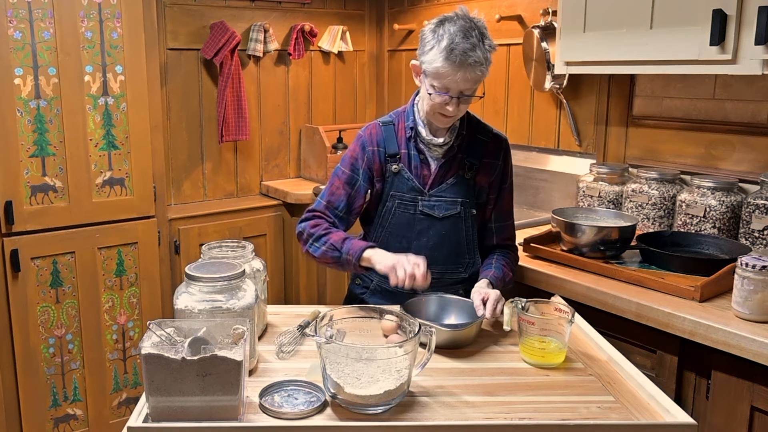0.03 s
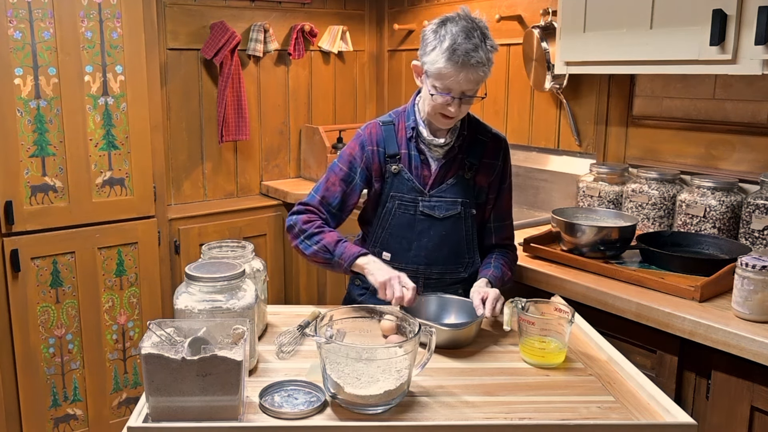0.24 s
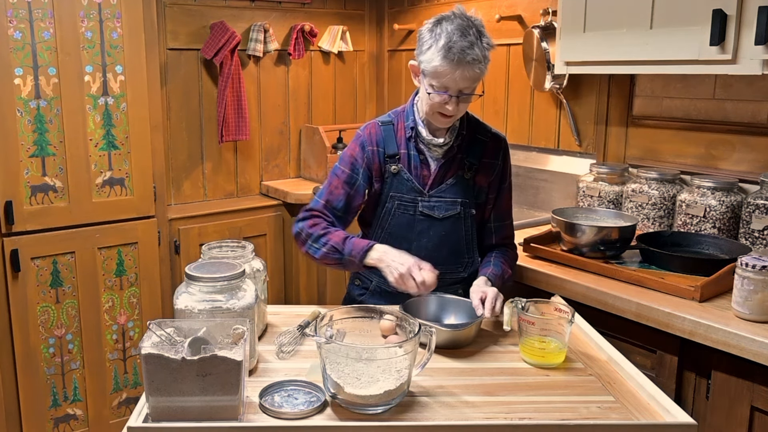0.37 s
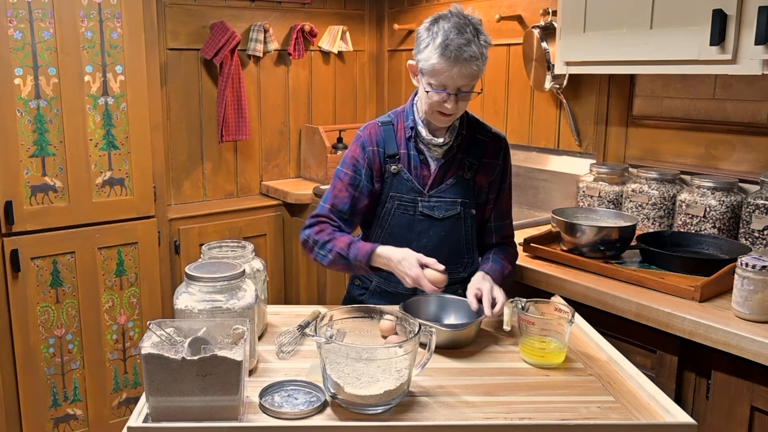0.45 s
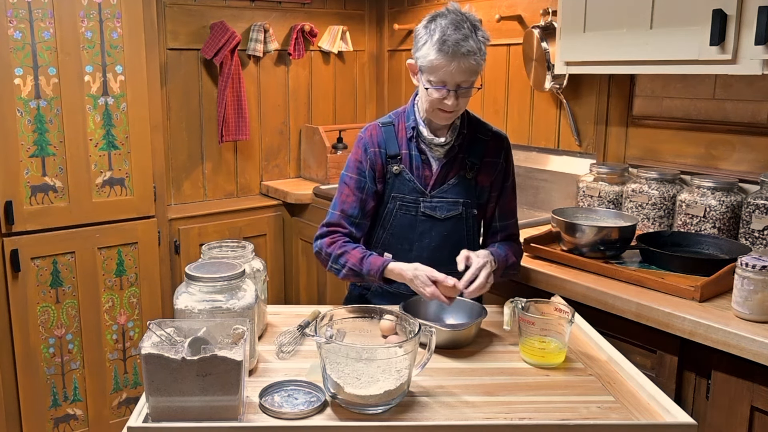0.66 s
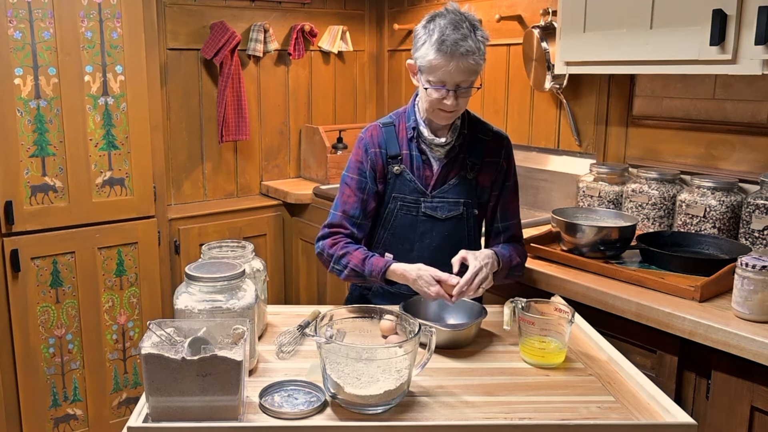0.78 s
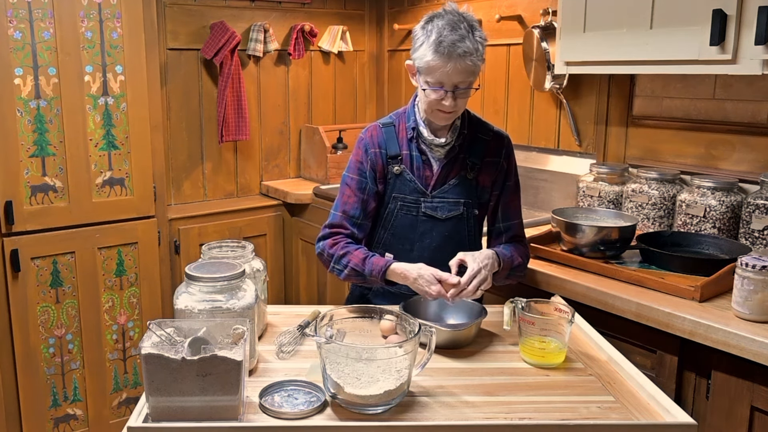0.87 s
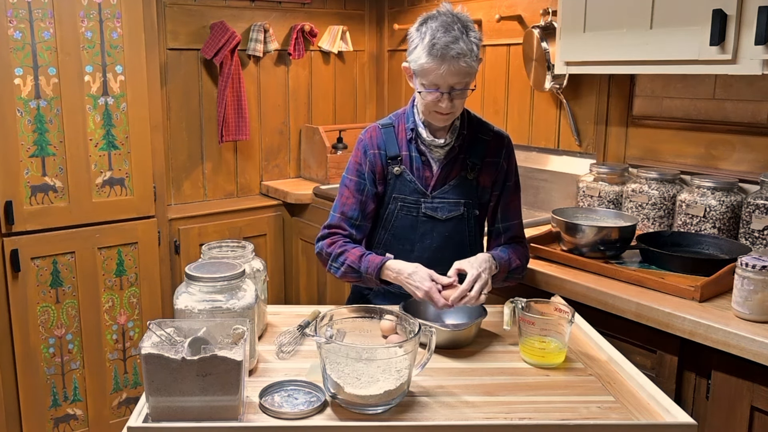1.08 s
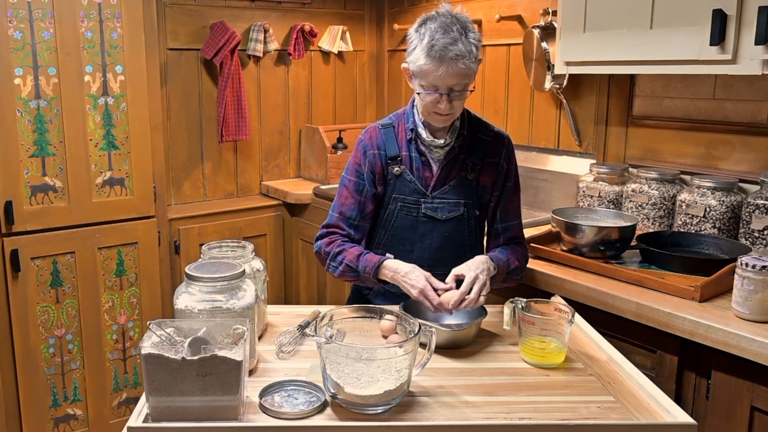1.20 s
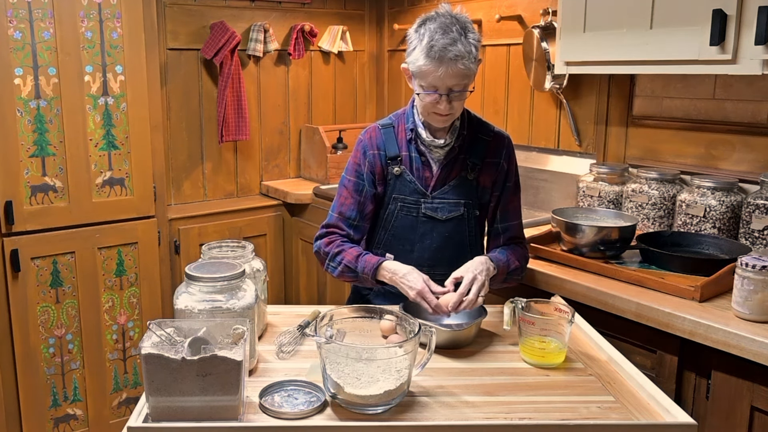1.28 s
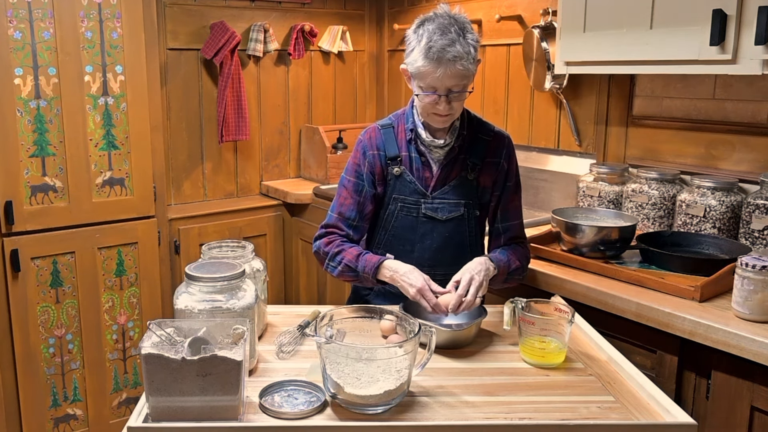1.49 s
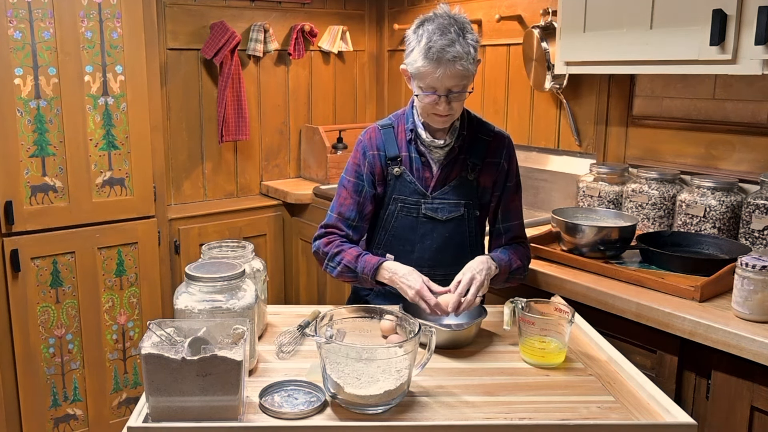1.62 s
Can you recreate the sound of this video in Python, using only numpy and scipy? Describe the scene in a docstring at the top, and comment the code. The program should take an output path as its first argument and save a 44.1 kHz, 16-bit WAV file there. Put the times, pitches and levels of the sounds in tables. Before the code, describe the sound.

An egg is cracked on a steel bowl: soft hand rubbing and a faint bump at 0.13 s, then one loud, crunchy knock at 0.22 s with a short damped clink, wooden table thump and brief room echo. Light rubbing and a thin squeak fade by 0.6 s. Near quiet follows, faint shell crackles around 1.0 s, crisper snaps at 1.35-1.44 s, then low room noise.

```python
"""In a small kitchen an egg is knocked once on the rim of a steel bowl that stands on a wooden table.
Filtered bursts make the shell's crunch and the thud; decaying sines make the bowl's clink and the table's thump.
The egg rubs and squeaks off the rim, then thumbs press until the shell crackles, snaps and comes apart:
random grains for rubbing and crackle, short bursts for snaps, narrow gliding noise for squeaks.
Fingers scuff the bowl, diffuse echo follows the egg's sounds, and quiet room noise lies under it all."""
import sys
import numpy as np
from scipy import signal
from scipy.fft import rfft, irfft, next_fast_len
from scipy.io import wavfile

SR = 44100
rng = np.random.default_rng(int(sys.argv[2]) if len(sys.argv) > 2 else 0)


def log_audio(samples):
    """Write samples as a 16-bit WAV file to the path given in sys.argv[1]."""
    # one column per channel
    frames = np.atleast_2d(samples).T
    # limit to full scale, then quantise
    limited = np.clip(frames, -1, 1)
    pcm = np.round(limited * 32767).astype(np.int16)
    wavfile.write(sys.argv[1], SR, pcm)


N = 72765
TIME = np.arange(N) / SR
KNOCK_S, BOWL_RISE_S = 0.2218, 0.0011


def from_db(db):
    """Decibels to gain."""
    return 10 ** (np.asarray(db) / 20)


def rms_one(x):
    """Scale to an rms of 1."""
    return x / np.sqrt(np.mean(x ** 2) + 1e-20)


def in_time(rows):
    """Draw each column of a time curve as straight lines, one value per sample."""
    points_s, *columns = np.transpose(rows)
    return [np.interp(TIME, points_s, column) for column in columns]


def at_hz(rows, hz):
    """Read each column of a spectrum at the given frequencies, on a log frequency axis."""
    points_hz, *columns = np.transpose(rows)
    return [np.interp(np.log(hz + 1), np.log(points_hz), column) for column in columns]


def colour(x, spectrum):
    """Causal minimum-phase filter with the given spectrum; white noise keeps its level."""
    size = 2 * next_fast_len(N)
    db, = at_hz(spectrum, np.arange(size // 2 + 1) * SR / size)
    cepstrum = irfft(np.log(rms_one(from_db(db))))
    # folding the cepstrum onto positive time makes the filter causal
    index = np.arange(size)
    fold = 1 + np.sign(size // 2 - index) * (index > 0)
    response = np.exp(rfft(cepstrum * fold))
    return irfft(rfft(x, size) * response)[:N]


def shelf(x, hz, db, side):
    """Lift or lower everything on one side of a frequency with a second-order shelf."""
    gain = from_db(db / 2)
    w = 2 * np.tan(np.pi * min(hz, SR / 2 - 1) / SR)
    b = np.array([1, w * np.sqrt(2 * gain), w * w * gain])
    a = np.array([1, w * np.sqrt(2 / gain), w * w / gain])
    if side == "high":
        b, a = a * gain ** 2, b
    return signal.lfilter(*signal.bilinear(b, a), x + 1e-18)


def peak(x, hz, db, q):
    """Lift a band around one frequency by adding its resonance."""
    resonance = signal.lfilter(*signal.iirpeak(min(hz, SR / 2 - 1), max(q, 1), fs=SR), x + 1e-18)
    return x + (from_db(db) - 1) * resonance


def blow(start_s, rise_s, t60):
    """Envelope of a blow: quick rise, exponential fall."""
    age = np.maximum(TIME - start_s, 0)
    fall = from_db(np.maximum(-60 * age / t60, -300))
    return (1 - np.exp(-age / rise_s)) * fall


def ring(modes, start_s, rise_s):
    """Modes set ringing by a blow: sines of random phase, each with its own decay."""
    out = np.zeros(N)
    for hz, db, t60 in modes:
        tone = np.sin(2 * np.pi * (hz * TIME + rng.random()))
        out += from_db(db) * blow(start_s, rise_s, t60) * tone
    return out


def burst(envelope):
    """A dense run of tiny fractures of random sign under an envelope."""
    return envelope * rng.choice([-1, 1], N)


def grains(per_s):
    """Random clicks of uneven size and sign; rms 1."""
    spread_db = 2.2
    sizes = from_db(spread_db * np.minimum(rng.exponential(1, N), 4))
    clicks = sizes * rng.choice([-1, 1], N)
    return rms_one(clicks * (rng.random(N) < per_s / SR))


def friction(width_hz):
    """The slow random waver of a rubbed resonance: lowpassed noise; rms 1."""
    low_pass = signal.butter(2, width_hz, fs=SR, output="sos")
    return rms_one(signal.sosfilt(low_pass, rng.standard_normal(N)))


def room_noise():
    """The quiet steady noise of the room: white noise under a fixed spectrum."""
    # colour of the noise: f/Hz, relative level/dB per Hz
    floor_spectrum = [(20, -9), (60, 2.5), (150, -6), (600, -15.5), (2000, -23), (6000, -29),
                      (16000, -23.5)]
    return from_db(-68.5) * colour(rng.standard_normal(N), floor_spectrum)


def rubbing():
    """Hand and egg rub on table and bowl: many small dull contacts."""
    # strength of the rubbing: t/s, level/dB
    rub_curve = [(0, -63), (.1, -62), (.135, -44), (.165, -47.5), (.21, -50), (.33, -51.5), (.5, -54.5),
                 (.58, -58), (.65, -79.5), (.9, -72), (1.01, -58), (1.06, -61.5), (1.13, -84),
                 (1.65, -76.5)]
    # colour of the rubbing: f/Hz, relative level/dB
    rub_spectrum = [(40, -3.5), (130, -1.5), (380, 0), (800, -3), (1400, -6.5), (2500, -16), (3500, -9.5),
                    (4900, -18), (10000, -26.5), (16000, -37)]
    db, = in_time(rub_curve)
    return colour(from_db(db) * grains(per_s=2400), rub_spectrum)


def table():
    """The wood answers the hand's soft bump, then the knock passed down through the bowl."""
    # modes of the hand's bump on the bowl: f/Hz, level/dB, t60/s
    bump_modes = [(346, -40.5, 0.22), (804, -34, 0.038), (930, -29, 0.039)]
    # modes of the table under the bowl: f/Hz, level/dB, t60/s
    table_modes = [(112.6, -39, .75), (138.7, -41.5, 0.84), (180, -32, 0.44), (226, -31, 0.26),
                   (291, -17, 0.22), (328.5, -27.5, .14), (377.7, -23.5, .1), (416.6, -21.5, .15),
                   (475.4, -30.5, 0.26), (514, -27.5, 0.16), (631.6, -23.5, 0.12), (747, -23, 0.29),
                   (786, -35, .28), (1150, -28, .13)]
    bump_s, bump_rise_s = 0.125, 0.0054
    lag_s, rise_s = 0.0057, 0.00052
    return ring(bump_modes, bump_s, bump_rise_s) + ring(table_modes, KNOCK_S + lag_s, rise_s)


def ringing():
    """Table and rim ring on, dying faster once the hand rests on the bowl."""
    # mode of the rim that sings on until the hand settles: f/Hz, level/dB, t60/s
    rim_modes = [(2306, -29, 0.72)]
    hand_settles_s, damping_db_per_s = 0.43, 76
    damping = from_db(-damping_db_per_s * np.maximum(TIME - hand_settles_s, 0))
    return (table() + ring(rim_modes, KNOCK_S, BOWL_RISE_S)) * damping


def scuffs():
    """Each stroke of the fingers on the bowl's side swells and fades on one high resonance of the steel."""
    # finger strokes: middle t/s, half length/s, level/dB
    finger_strokes = [(0.139, 0.011, -52.5), (0.188, 0.016, -52), (0.477, 0.046, -60)]
    steel_hz, width_hz = 5090, 220
    swell = sum(from_db(db) * np.exp(-((TIME - s) / length) ** 2) for s, length, db in finger_strokes)
    return swell * friction(width_hz) * np.sin(2 * np.pi * steel_hz * TIME)


def snaps():
    """Each crack breaks sharply, runs on for milliseconds and rings the piece of shell that it frees."""
    # small breaks and touches of the shell:
    # t/s, length/s, level/dB, bass lift/dB, treble lift/dB, pitch of the piece f/Hz
    shell_breaks = [(0.135, 0.0046, -58, 6, -6, 5070), (0.18, 0.0033, -48, -2, -22, 1100),
                    (0.2737, .0012, -23.5, 17, -1, 9100), (0.2755, 0.006, -34.5, 6.5, 3, 9000),
                    (0.904, 0.0015, -62.5, 10, -1, 1980), (.9897, 0.0016, -50.5, 3.5, -8, 3723),
                    (1.0196, 0.0065, -42.5, 6.5, 4, 3900), (1.0229, 0.0042, -47, 18, -14, 890),
                    (1.026, 0.007, -56, -3, 11, 5490), (1.0604, 0.0023, -43.5, -1, 5, 1150),
                    (1.3540, 0.0026, -31, -3.5, 5, 1570), (1.364, .003, -44.5, 1, 0.5, 5490),
                    (1.384, 0.0011, -60, -4, 1, 9000), (1.4017, 0.0058, -37.5, 2.5, 0, 6230),
                    (1.4151, 0.0043, -36, 6.5, -1, 2380), (1.4229, 0.0026, -37.5, -3, 8.5, 14100),
                    (1.4258, 0.0019, -38, -1.5, 5, 650), (1.4355, 0.0013, -39.5, -9, 1, 11200),
                    (1.531, 0.0088, -67, -1, 4, 9000), (1.602, 0.0024, -58, -1, -7, 1800)]
    # colour shared by all breaks: f/Hz, relative level/dB
    shell_spectrum = [(60, -12), (240, 0), (650, 2), (1000, -4), (1430, 3), (2700, -1), (3700, 1),
                      (4400, -5), (6100, -5), (7600, -6.5), (9400, 1), (10700, -5), (13000, -4),
                      (16000, -8)]
    bass_hz, treble_hz = 820, 6650
    first_break_db, piece_peak_db, piece_q = 9.5, 7, 1.5
    out = np.zeros(N)
    for s, length, db, bass_db, treble_db, piece_hz in shell_breaks:
        fade = np.exp(-np.minimum(((TIME - s) / length) ** 2, 20))
        crack = burst((TIME >= s) * fade)
        crack[int(s * SR)] = from_db(first_break_db)
        crack = shelf(crack, bass_hz, bass_db, "low")
        crack = shelf(crack, treble_hz, treble_db, "high")
        out += from_db(db) * peak(crack, piece_hz, piece_peak_db, piece_q)
    return colour(out, shell_spectrum)


def crackle():
    """Shell and membrane crackle finely under strain: bright random grains."""
    # strength of the crackle: t/s, level/dB
    strain_curve = [(.25, -65), (.42, -58.5), (.48, -71.5), (.68, -82.5), (.75, -73.5), (.88, -72),
                    (.99, -55), (1.03, -54.5), (1.11, -69.5), (1.348, -77.5), (1.357, -49.5),
                    (1.385, -52.5), (1.435, -44), (1.49, -69.5), (1.54, -64.5), (1.58, -75), (1.65, -75)]
    # colour of the crackle: f/Hz, relative level/dB per Hz
    crackle_spectrum = [(300, -4.5), (1500, -8), (3500, -4.5), (6500, -5.5), (8800, 1.5), (12000, -0.5),
                        (16000, -9)]
    db, = in_time(strain_curve)
    return colour(from_db(db) * grains(per_s=2600), crackle_spectrum)


def knock():
    """The egg hits the rim: fracture bursts crunch and thud, and the bowl's modes clink."""
    # shell giving way on the rim: f/Hz, relative level/dB per Hz
    crunch_spectrum = [(200, -8), (900, 1), (2800, -1), (4300, -6.5), (6300, -14.5), (7700, -6), (9300, 4),
                       (11500, -8), (14500, -3.5), (16000, -10)]
    # dull blow that goes with it: f/Hz, relative level/dB per Hz
    thud_spectrum = [(25, -40.5), (60, -19), (150, -10.5), (350, -1.5), (800, -5), (1600, -8),
                     (3000, -16.5), (8000, -41.5)]
    # short modes of the bowl, damped by the egg on its rim: f/Hz, level/dB, t60/s
    bowl_modes = [(1592, -12, 0.061), (2176, -11, 0.065), (2920, -20, 0.07), (3585, -1, .024),
                  (3660, -33, .21), (4660, -27, 0.063), (8750, -9.5, .022), (9170, -1.5, .024),
                  (9980, -7, 0.054), (10080, -5.5, 0.015), (10700, -7.5, 0.033)]
    crunch_envelope = blow(KNOCK_S, rise_s=0.00015, t60=0.042)
    crunch = from_db(-4.5) * colour(burst(crunch_envelope), crunch_spectrum)
    thud_envelope = blow(KNOCK_S, rise_s=0.0019, t60=0.08)
    thud = from_db(-14) * colour(burst(thud_envelope), thud_spectrum)
    low_cut = signal.butter(2, 100, "high", fs=SR, output="sos")
    return signal.sosfilt(low_cut, crunch + thud) + ring(bowl_modes, KNOCK_S, BOWL_RISE_S)


def squeak(curve, width_hz):
    """Thin friction noise: a slow random waver carried on a tone that glides in pitch."""
    hz, db = in_time(curve)
    sounding = (TIME > curve[0][0]) * (TIME < curve[-1][0])
    tone = np.sin(2 * np.pi * np.cumsum(hz) / SR)
    return sounding * from_db(db) * friction(width_hz) * tone


def rim_squeak():
    """The egg squeaks thinly as it slides off the rim, at a nearly steady pitch."""
    # glide of the squeak: t/s, f/Hz, level/dB
    rim_glide = [(.35, 8560, -83), (.41, 8550, -55.5), (.45, 8650, -61), (.52, 8600, -84)]
    return squeak(rim_glide, width_hz=62)


def shell_squeak():
    """The pressed shell squeaks as friction sweeps its pitch up, then down."""
    # glide of the squeak: t/s, f/Hz, level/dB
    shell_glide = [(.72, 9480, -90), (.745, 9900, -70), (.775, 12220, -72), (.83, 10890, -74),
                   (.88, 10150, -67), (.95, 9080, -82.5)]
    return squeak(shell_glide, width_hz=130)


def kitchen(x):
    """Diffuse echo: bands of noise that each die at their own rate, convolved with the sound."""
    # echo of the kitchen: f/Hz, level against the direct sound/dB, t60/s
    room_bands = [(101, -6, .6), (298, -11.5, 0.59), (650, -3.5, 0.27), (1560, -9.5, 0.37),
                  (3570, -16.5, 0.3), (6750, -5.5, 0.24), (9500, -21.5, .24), (14900, -12.5, 0.13)]
    edges_hz = np.geomspace(40, 18000, 15)
    response = np.zeros(N)
    for low, high in zip(edges_hz, edges_hz[1:]):
        db, t60 = at_hz(room_bands, np.sqrt(low * high))
        band_pass = signal.butter(2, [low, high], "band", fs=SR, output="sos")
        band = signal.sosfilt(band_pass, rng.standard_normal(N))
        tail = rms_one(band * blow(0, rise_s=0.0073, t60=t60))
        # the band's share of the whole spectrum sets its energy
        response += from_db(db) * tail * np.sqrt(2 * (high - low) / SR / N)
    return signal.fftconvolve(x, response)[:N]


def scene():
    """Knock, cracks, rubbing and squeaks echo; table, rim and scuffs join dry over room noise."""
    direct = rubbing() + snaps() + knock() + crackle() + rim_squeak() + shell_squeak()
    mix = room_noise() + direct + kitchen(direct) + ringing() + scuffs()
    return mix[None]


def record(dry):
    """The knock overloads the microphone, a soft tanh curve; the deepest rumble and the top are cut."""
    overload = 1  # full scale of the soft limit
    rumble_cut = signal.butter(2, 36, "high", fs=SR, output="sos")
    top_cut = signal.cheby2(24, 75, 16150, fs=SR, output="sos")
    limited = overload * np.tanh(dry / overload)
    return signal.sosfilt(top_cut, signal.sosfilt(rumble_cut, limited))


dry = scene()
out = record(dry)
log_audio(out)
```